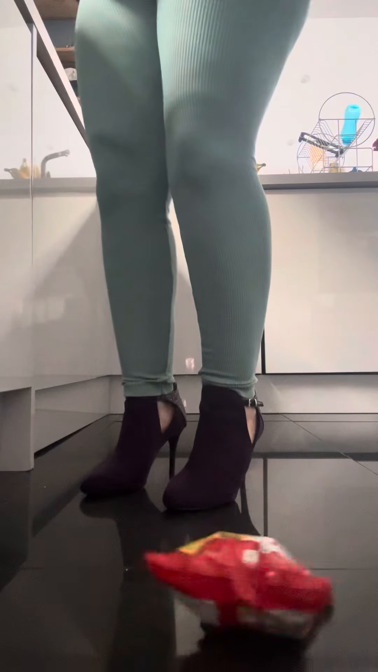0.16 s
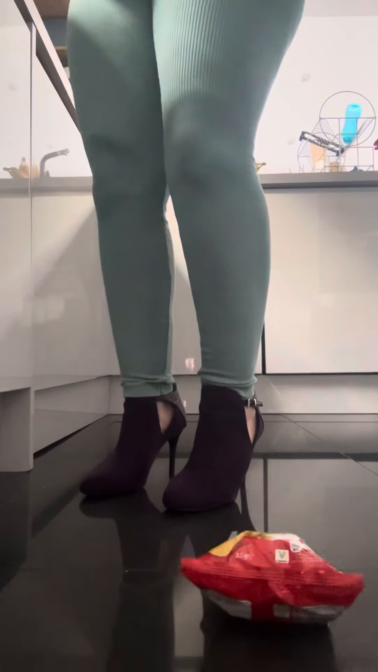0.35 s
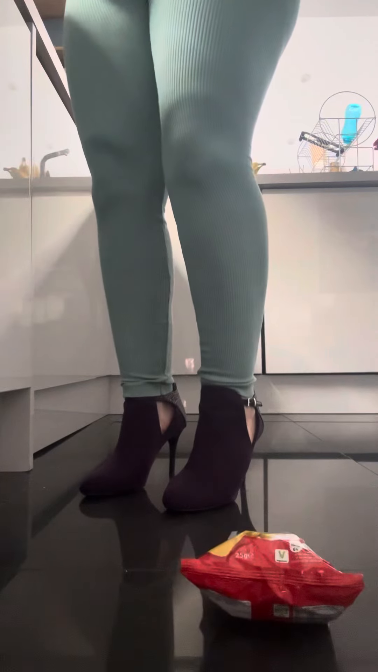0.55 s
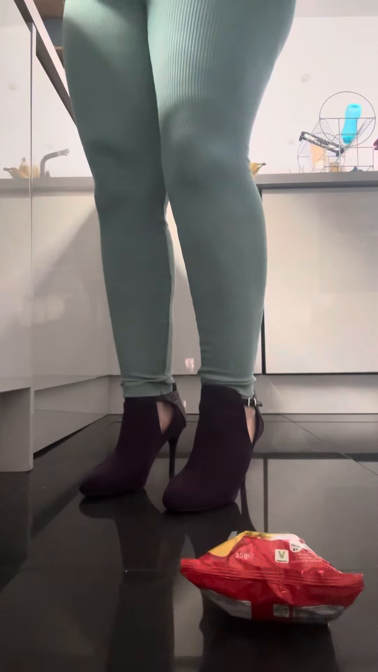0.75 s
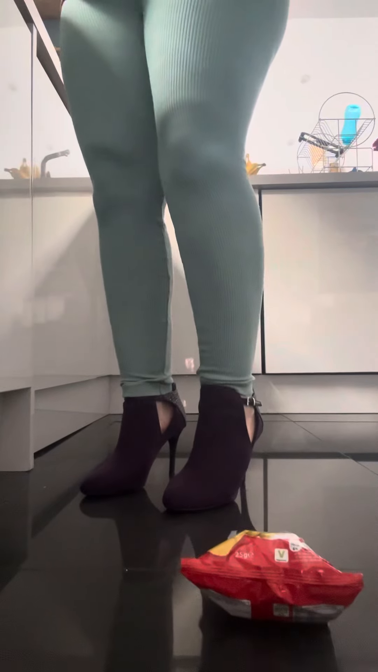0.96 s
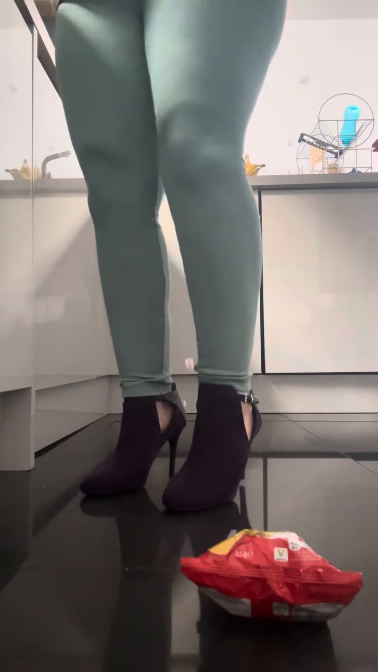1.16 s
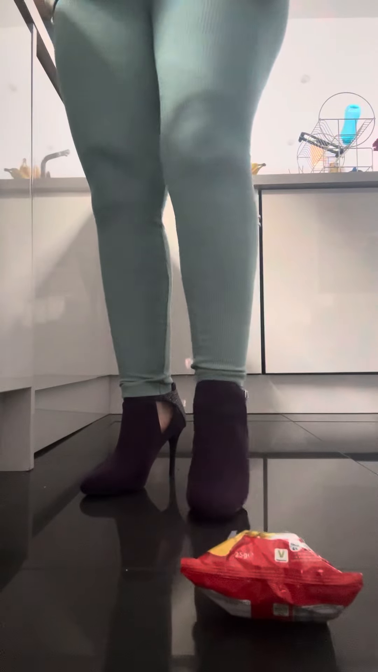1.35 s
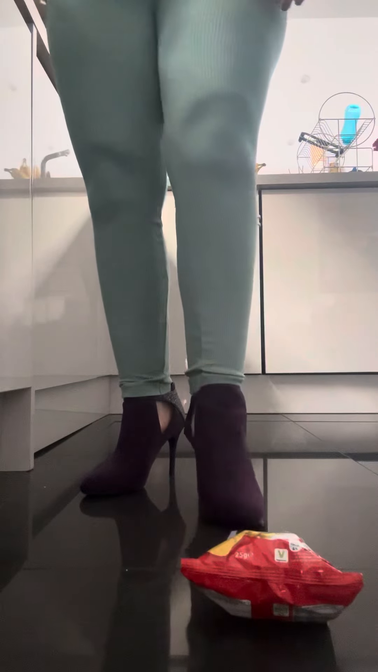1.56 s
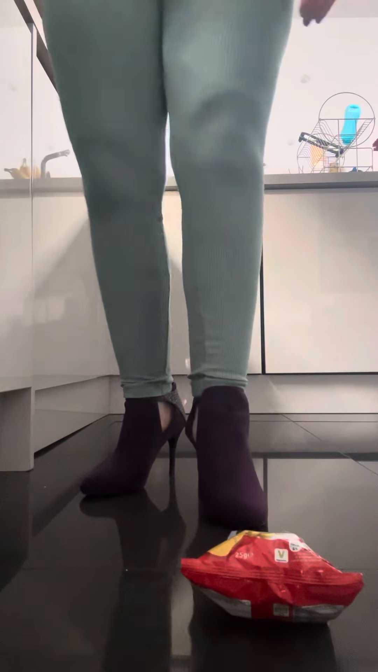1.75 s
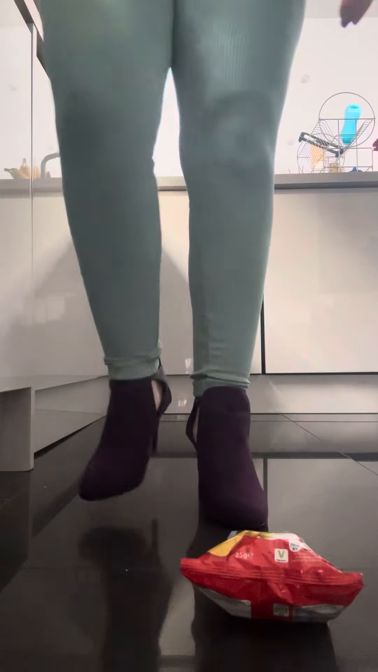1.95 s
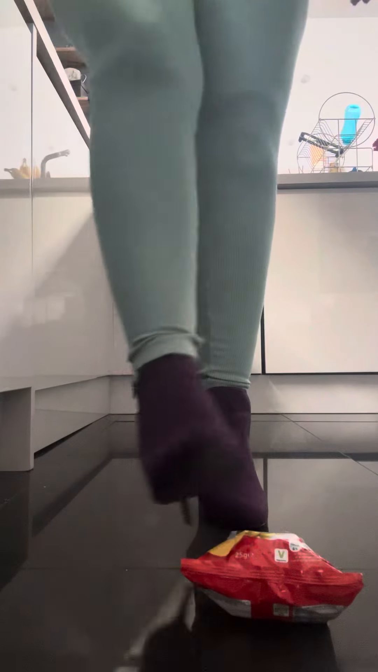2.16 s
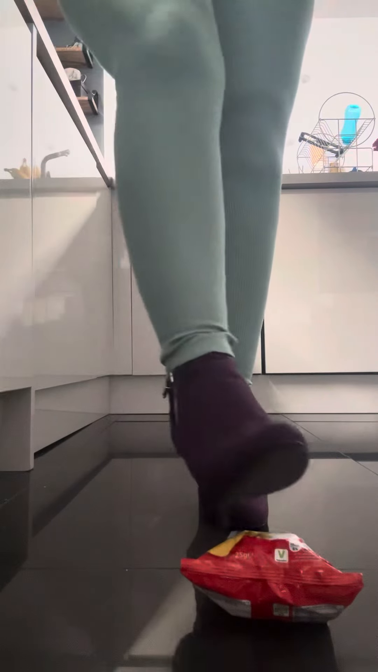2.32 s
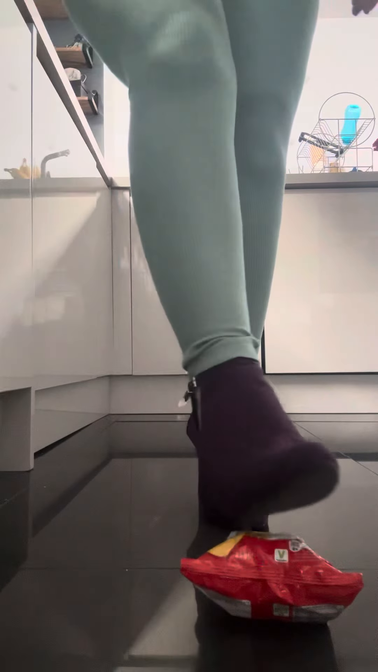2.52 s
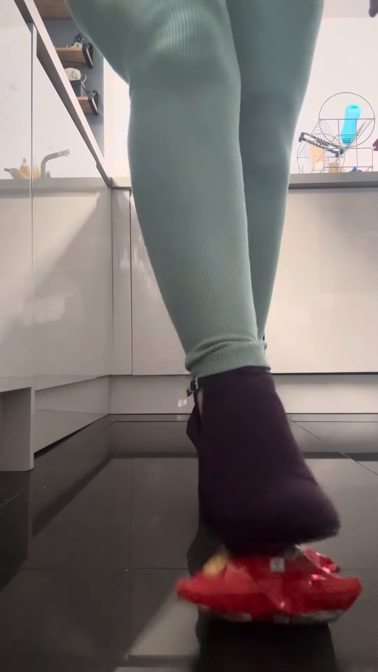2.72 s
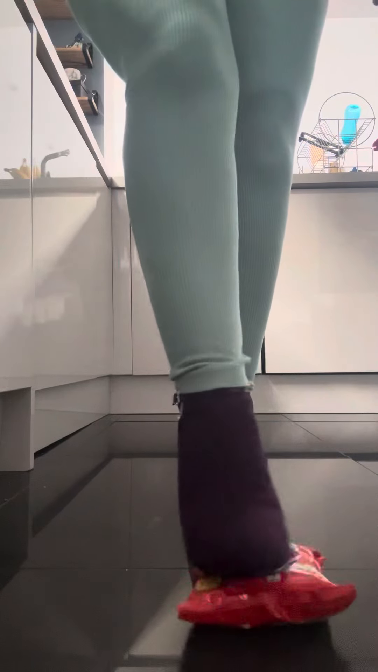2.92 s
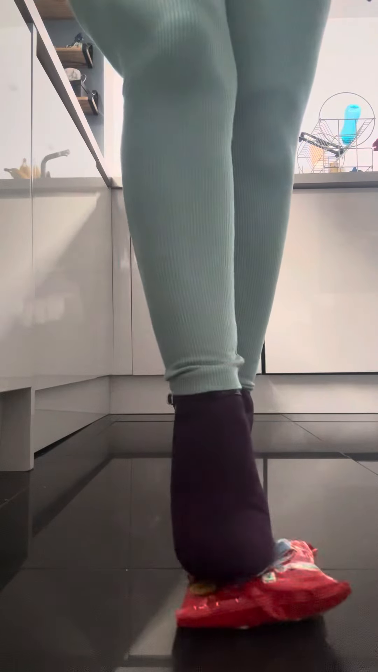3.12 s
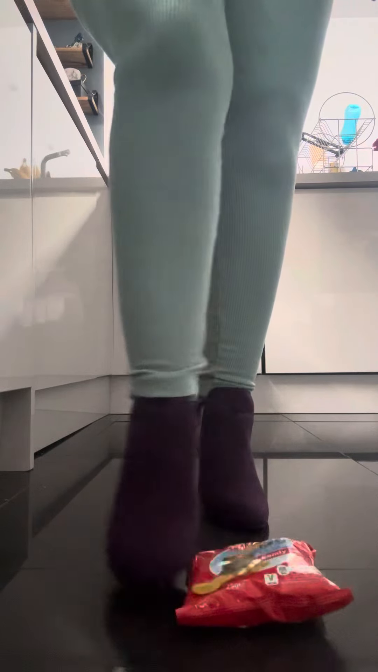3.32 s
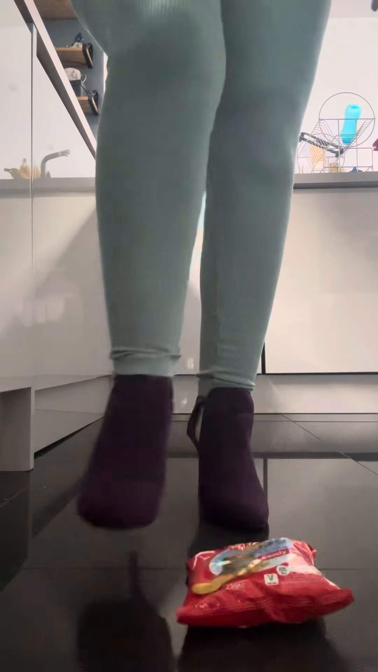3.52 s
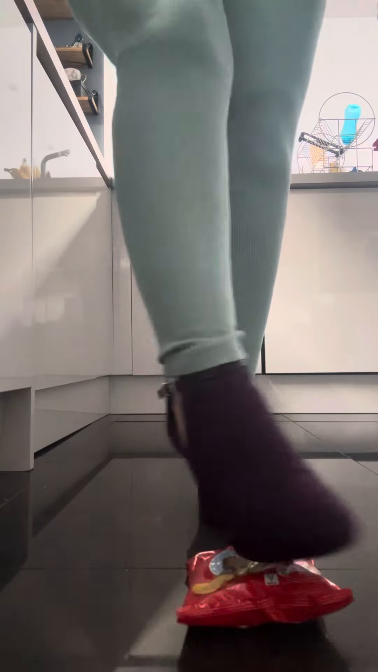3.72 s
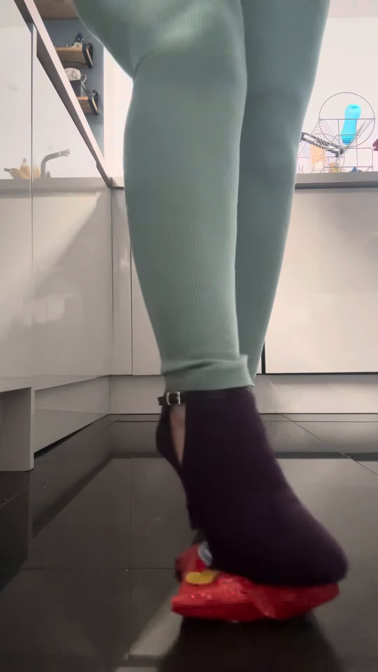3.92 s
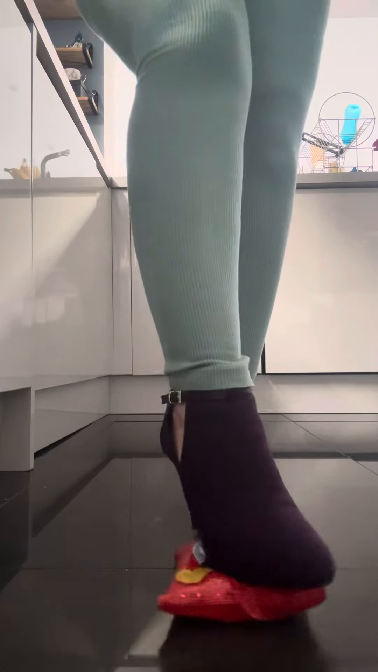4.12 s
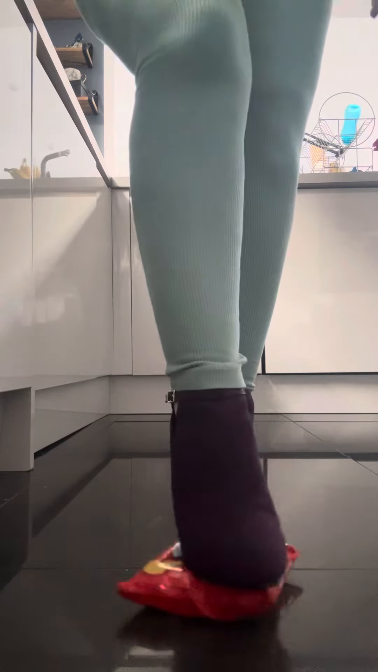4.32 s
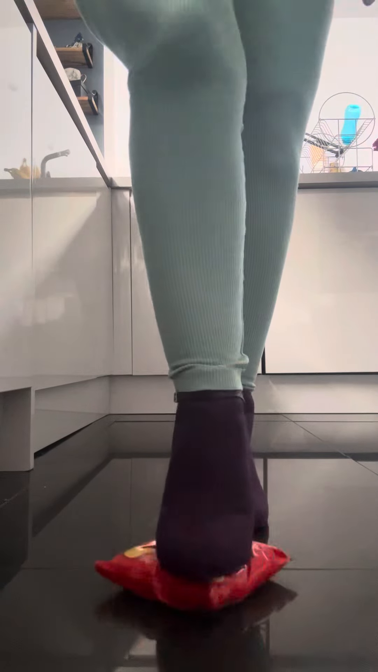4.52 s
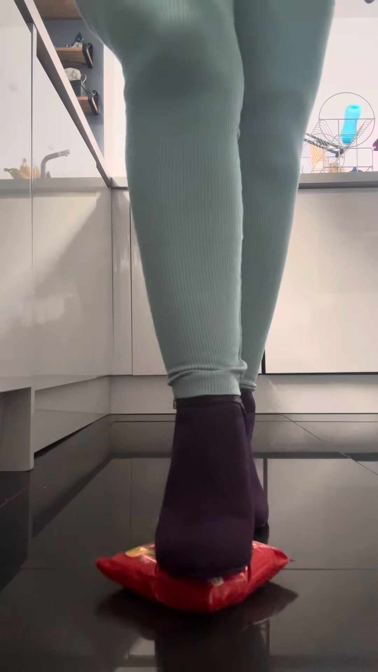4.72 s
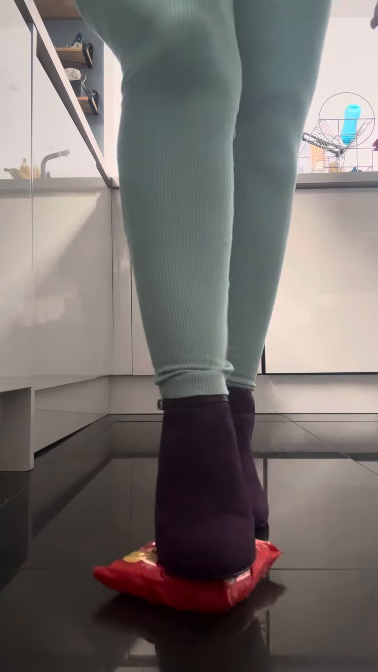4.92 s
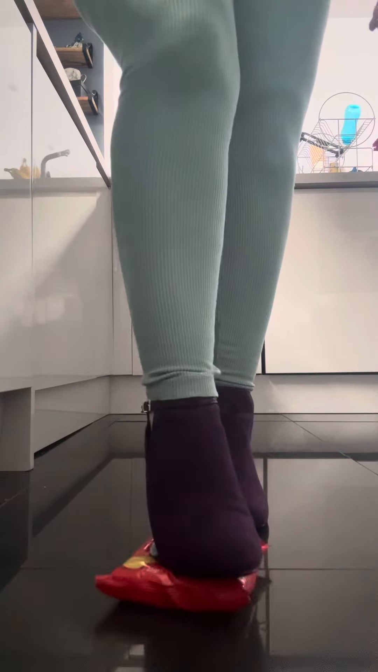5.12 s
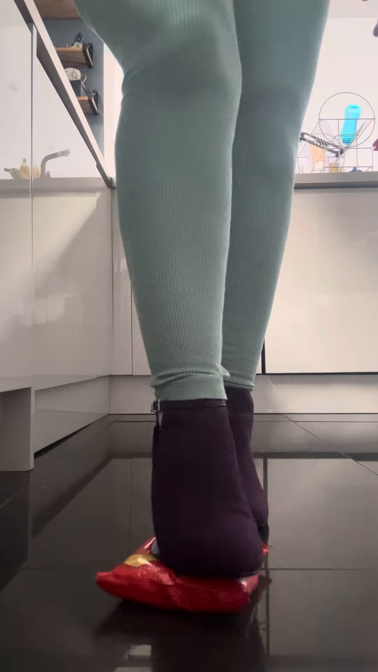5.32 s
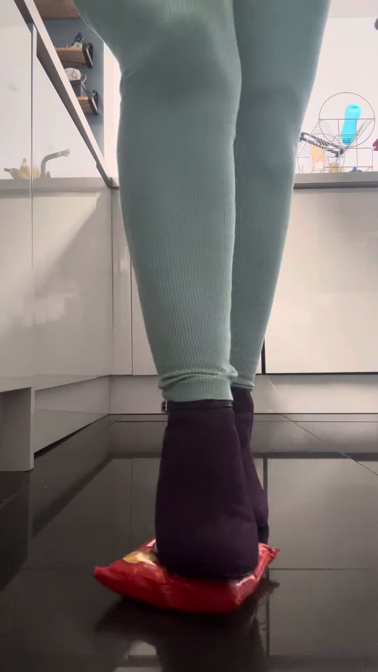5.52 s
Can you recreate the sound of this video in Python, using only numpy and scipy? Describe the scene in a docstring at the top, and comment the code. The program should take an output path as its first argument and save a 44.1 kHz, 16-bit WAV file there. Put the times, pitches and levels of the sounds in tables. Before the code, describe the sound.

A small hard kitchen, heard close in stereo, with a faint low fridge hum and soft hiss. At about 0.06 s a foil snack bag hits the tiles with a sharp crackling slap and a low puffy thump, its rustle fading quickly. Around 0.5 and 0.76 s, two dull booming slams come from the next room, shaking the floor and leaving a thin metallic ring. Heels knock lightly at 1.05 and 1.5 s, with a brief low rumble near 1.7 s and small ticks at 2.15 and 2.45 s. From 2.6 to 3.3 s a boot crushes the bag: snapping creases, dense foil crackle, crunching crisps and soft air thumps. A crisp heel tick lands at 3.53 s. A harder stamp hits at 3.9 s amid a raised steady hiss, then grinding crunches from 4.4 to 4.75 s, another sharp crunch at 5.0 s, and sparse, brittle crinkles until 5.65 s.

```python
"""A hard, ringing kitchen with a fridge hum, heard by two microphone ports a few centimetres apart.
A foil snack bag drops on the tiles; something heavy shuts twice in the next room; heels click, cloth rustles.
Then a heeled boot treads the bag flat: creases snap, crisps crunch, air is pushed.
Foil, tile and walls are struck resonances; hiss, contact and room tails are shaped noise."""
import sys
import numpy as np
from scipy import signal
from scipy.fft import rfft, irfft, next_fast_len
from scipy.io import wavfile

SR = 44100
rng = np.random.default_rng(int(sys.argv[2]) if len(sys.argv) > 2 else 0)


def inscribe(sig):
    """Save sig as 16-bit PCM at rate SR to the path in sys.argv[1].

    A 1-D sig is mono; a 2-D sig holds one channel per row.
    Samples are clipped to [-1, 1] before scaling.
    """
    pcm = np.round(np.clip(np.atleast_2d(sig).T, -1, 1) * 32767)
    wavfile.write(sys.argv[1], SR, pcm.astype(np.int16))


N = 250047

# Quiet background, hiss and rustle: (time [s], level [dB])
AIR_LEVEL = [(0, -51.5), (1.25, -67), (1.5, -60), (1.7, -62), (1.92, -54.5), (1.98, -65.5), (2.1, -83),
             (2.16, -68), (2.46, -62.5), (2.6, -74.5), (3.6, -62.5), (3.8, -72), (3.9, -47.5),
             (5.67, -47.5)]
# Colour of the hiss: (frequency [Hz], level [dB])
HISS_SPECTRUM = [(300, -21), (2000, -9), (3300, -3.5), (6000, -16.5), (10000, -27.5), (14000, -24),
                 (16000, -28)]
# Colour of the room tone: (frequency [Hz], level [dB])
ROOM_TONE_SPECTRUM = [(30, -15.5), (100, -2.5), (300, -9), (600, -16), (1500, -39.5)]
ROOM_TONE_DB = -60.5
HUM_HZ, HUM_DB = 187, -58
WHIRR_HZ, WHIRR_WIDTH_HZ, WHIRR_DB = 2550, 260, -6  # level against the hiss
# Weight shifting on the floor: (start [s], rumble level [dB], hold [s])
WEIGHT_SHIFTS = [(1.69, -42.5, 0.096)]
SHIFT_RISE_DB_PER_S, SHIFT_SAG_DB_PER_S, SHIFT_FALL_DB_PER_S = 388, 41.5, 163.5

# Slams in the next room: (time [s], boom drive [dB], floor shake drive [dB], rattle drive [dB])
DISTANT_SLAMS = [(0.512, -24, -28.5, -29.5), (0.558, -36, -32, -34), (0.757, -35, -61.5, -30),
                 (.767, -23.5, -40, -61)]
# Resonances of the walls: (frequency [Hz], level [dB], t60 [s])
WALL_MODES = [(111.4, -9.5, 0.33), (141, 1.5, 0.24), (174, 2, 0.17), (223.4, -6, 0.29), (293, -2, 0.099),
              (414.5, -2, 0.096)]
# The loose metal fitting is jolted: (time [s], drive [dB])
FITTING_JOLTS = [(.512, 0), (.558, -7), (.758, -9)]
# Resonances of the fitting: (frequency [Hz], level [dB], t60 [s])
FITTING_MODES = [(1065, -54, 0.8), (1976, -45, 0.9), (2159, -48, 0.6), (2540, -53, 0.5), (3036, -40, 0.5),
                 (4247, -48, 0.5), (4430, -47, 0.55), (4940, -49, 0.12)]

# Heels on tile: (time [s], knock drive [dB], knock pitch [Hz], tick drive [dB])
HEEL_STEPS = [(1.045, -45, 530, -34.5), (1.511, -31.5, 520, -62.5), (2.147, -68.5, 400, -30.5),
              (2.405, -47, 1000, -62.5), (2.457, -62.5, 2400, -32), (3.531, -56, 870, -22.5)]
# Resonances of the tile: (frequency [Hz], level [dB], t60 [s])
TILE_MODES = [(190, -1, 0.037), (286, -2.5, 0.064), (418, -2, 0.07), (609, 6.5, 0.029), (760, -7, 0.0092)]

# The cushion of air in the bag is pushed: (time [s], drive [dB], pitch [Hz])
AIR_PUSHES = [(0.071, -22.5, 84.7), (2.714, -30, 210), (2.856, -15, 367), (3.892, -7.5, 400),
              (3.906, -22, 190), (4.716, -6, 410), (4.722, -24.5, 160), (5.01, -13, 375),
              (5.142, -22.5, 122)]
# The bag lands, then the sole presses in separate crunches: (start [s], crackle drive [dB], hold [s])
BAG_CRUNCHES = [(.053, -32, .008), (.062, -20, 0.0011), (.085, -40, 0.26), (2.588, -38.5, 0.022),
                (2.708, -31, 0.084), (2.84, -23, 0.15), (3.158, -35, 0.061), (3.22, -29.5, 0.0087),
                (3.29, -41.5, 0.0052), (3.857, -37, .012), (3.874, -27.5, .012), (3.888, -18.5, 0.0092),
                (3.93, -23.5, 0.021), (4.218, -35, 0.027), (4.44, -36.5, 0.035), (4.48, -41, .07),
                (4.56, -27.5, 0.19), (5.012, -21.5, 0.011), (5.07, -33, 0.067), (5.135, -35.5, 0.12),
                (5.55, -43, 0.012), (5.63, -43.5, .04)]
CRUNCH_RISE_DB_PER_S, CRUNCH_SAG_DB_PER_S, CRUNCH_FALL_DB_PER_S = 2002, 40.5, 304.5
# Single creases snapping: (time [s], drive [dB], patch pitch [Hz], treble [dB])
CREASE_SNAPS = [(0.01, -31.5, 1970, -47), (0.062, -21.5, 1600, 14), (0.066, -4.5, 923, -20),
                (2.583, -40, 880, -23), (2.609, -38, 910, 2), (2.711, -16.5, 935, -8),
                (2.737, -15, 2110, -5), (2.757, -24.5, 1900, -1), (2.78, -17.5, 2120, -14),
                (2.841, -14.5, 2810, -18), (2.853, -16, 900, -17), (2.872, -9, 2055, -27.5),
                (2.9, -18.5, 1700, -26), (2.931, -8, 820, -12), (2.951, -13.5, 810, -10),
                (2.997, -14.5, 2060, 0), (3.011, -23, 950, -15), (3.164, -24, 800, -17),
                (3.176, -24, 1860, -13), (3.211, -19, 2140, -28), (3.232, -38, 1670, -5),
                (3.294, -25, 686, -6.5), (3.338, -26.5, 2670, -27), (3.871, -22.5, 847, -42),
                (3.892, -11.5, 1530, -11), (3.911, -6.5, 867, -12), (3.922, -8.5, 930, -6),
                (3.936, -16.5, 880, -4), (3.978, -13.5, 816, -15), (4.161, -30, 760, -1.5),
                (4.221, -18, 900, -32), (4.238, -20, 834, -4), (4.396, -29, 1020, -8.5),
                (4.471, -20.5, 900, -5), (4.505, -11.5, 1810, -8.5), (4.519, -19.5, 1900, -7),
                (4.558, -13.5, 3150, -0.5), (4.571, -15, 920, 3.5), (4.578, -14, 1660, -7),
                (4.601, -17.5, 2950, -1), (4.617, -25.5, 860, 10), (4.636, -18.5, 3080, 1),
                (4.653, -20, 1050, 10), (4.686, -19.5, 3000, 4.5), (4.712, -13, 1810, -2.5),
                (4.72, -13.5, 3080, -2.5), (4.909, -21.5, 3470, 1), (4.938, -20, 1830, 2),
                (5.009, -6, 1120, -6), (5.135, -29, 1720, 9), (5.144, -24, 1650, 7), (5.186, -28, 4430, 13),
                (5.227, -26.5, 1190, 6.5), (5.236, -22.5, 3070, 3.5), (5.302, -27, 2000, 6),
                (5.356, -31, 3160, 1.5), (5.395, -26, 2040, 1), (5.429, -40.5, 1130, 11.5),
                (5.514, -35, 1710, 8), (5.564, -30, 3100, 9), (5.634, -41, 1960, 14), (5.655, -27, 1080, 1)]
# Colour of the foil: (frequency [Hz], level [dB])
FOIL_SPECTRUM = [(100, -30), (330, -9.5), (600, -2), (1000, 1.5), (2000, -2), (3200, 2.5), (5000, -6.5),
                 (7000, -7), (10000, -12.5), (16000, -17)]

# Decay of the kitchen: (frequency [Hz], t60 [s])
KITCHEN_DECAY = [(100, 0.53), (2000, 0.45), (5000, 0.48), (13000, 0.35)]
# Phase by which the left port leads: (frequency [Hz], lead [rad])
LEFT_LEAD = [(150, 0), (700, .5), (1700, .1), (2400, -2.6), (3000, -3.4), (4100, -3.3), (6100, -5),
             (7200, -4.4), (8200, -3.2), (10300, -3.1), (12400, -.9), (13500, -.1)]
# Level of the left port over the right: (frequency [Hz], difference [dB])
LEFT_LOUDER = [(400, 0), (1000, 4), (1900, 8), (2700, 5), (3300, 5), (4200, 0)]
# The part the ports do not share: (frequency [Hz], level [dB])
UNSHARED_SPECTRUM = [(60, -33.5), (500, -7), (1500, -6.5), (4500, -5.5), (7200, -21.5), (10300, -22.5),
                     (13500, -21.5)]
CUTOFF_HZ = 16900


def amp(db):
    """Gain of a level in dB."""
    return 10 ** (np.asarray(db) / 20)


def rms_one(x):
    """Scale to unit rms."""
    return x / np.sqrt(np.mean(x ** 2) + 1e-20)


def in_time(rows):
    """A curve, sample by sample."""
    return np.interp(np.arange(N) / SR, *np.transpose(rows))


def at_hz(points, hz):
    """Read a spectrum on a log-frequency axis."""
    f, v = np.transpose(points)
    return np.interp(np.log(hz + 1), np.log(f + 1), v)


def coloured(x, spectrum):
    """Give x the spectrum; white noise of rms 1 keeps rms 1."""
    size = next_fast_len(x.shape[-1] + SR // 10)
    hz = np.arange(size // 2 + 1) * SR / size
    gain = rms_one(amp(at_hz(spectrum, hz)))
    return irfft(rfft(x, size) * gain, size)[..., :x.shape[-1]]


def band(x, low_hz, high_hz):
    """Butterworth band-pass."""
    edges = np.clip([low_hz, high_hz], 10, .45 * SR)
    return signal.sosfilt(signal.butter(2, edges, "band", fs=SR, output="sos"), x + 1e-18)


def drift(rate_hz):
    """Slow random wander of rms 1: noise through a two-pole low-pass."""
    r = np.exp(-2 * np.pi * rate_hz / SR)
    wander = signal.lfilter([1], [1, -2 * r, r * r], rng.standard_normal(N + SR))
    return rms_one(wander[SR:])


def train(times, db):
    """One click per event."""
    out = np.zeros(N)
    np.add.at(out, np.minimum((np.asarray(times) * SR).astype(int), N - 1), amp(db))
    return out


def fading(clicks, seconds):
    """Each click becomes an envelope that dies with this time constant."""
    return signal.lfilter([1], [1, -np.exp(-1 / (seconds * SR))], clicks + 1e-18)


def burst(clicks, rise_s, fall_s):
    """Noise under an envelope that swells fast and dies slower."""
    envelope = fading(fading(clicks, fall_s), rise_s) / (rise_s * SR)
    return envelope * rng.standard_normal(N)


def crack(times, db, rise_s, fall_s):
    """Short bursts of even spectrum and random phase, a new one for every event; peak near the given level."""
    t = np.arange(1024) / SR
    shape = np.exp(-t / fall_s) * (1 - np.exp(-t / rise_s))
    spectra = rfft(rng.standard_normal((len(times), len(t))) * shape)
    bursts = irfft(spectra / np.abs(spectra)) * np.sqrt(shape)
    out = np.zeros(N + len(t))
    for s, gain, b in zip(times, amp(db), bursts):
        start = int(s * SR)
        out[start:start + len(t)] += gain * b / np.sqrt(np.sum(b ** 2) / np.sum(shape ** 2))
    return out[:N]


def ring(clicks, hz, t60):
    """A unit click sets a decaying sine of starting height 1 ringing."""
    r, w = amp(-60 / (t60 * SR)), 2 * np.pi * hz / SR
    return signal.lfilter([0, np.sin(w)], [1, -2 * r * np.cos(w), r * r], clicks + 1e-18)


def struck(force, modes):
    """All modes of a body, signs alternating."""
    return sum((-1) ** k * amp(db) * ring(force, hz, t60) for k, (hz, db, t60) in enumerate(modes))


def presses(rows, rise, sag, fall):
    """Level in dB of presses that swell up to their start, sag while held and then die; slopes in dB per second."""
    t = np.arange(N) / SR
    levels = []
    for s, db, hold in rows:
        before, held, after = np.maximum(s - t, 0), np.clip(t - s, 0, hold), np.maximum(t - s - hold, 0)
        levels.append(db - rise * before - sag * held - fall * after)
    return np.max(levels, axis=0)


def background():
    """Shared and unshared parts of hiss, a narrow whirr within it and room tone; rumble and fridge hum are shared."""
    air_db = in_time(AIR_LEVEL)
    hiss = amp(air_db + 1.8 * drift(39)) * coloured(rng.standard_normal((2, N)), HISS_SPECTRUM)
    half_width = WHIRR_WIDTH_HZ / 2
    whirr = rms_one(band(rng.standard_normal((2, N)), WHIRR_HZ - half_width, WHIRR_HZ + half_width))
    tone = amp(ROOM_TONE_DB) * coloured(rng.standard_normal((2, N)), ROOM_TONE_SPECTRUM)
    rumble_db = presses(WEIGHT_SHIFTS, SHIFT_RISE_DB_PER_S, SHIFT_SAG_DB_PER_S, SHIFT_FALL_DB_PER_S)
    rumble = amp(rumble_db) * rms_one(band(rng.standard_normal(N), 28.2, 84))
    hum_gain = amp(HUM_DB + 0.84 * drift(3)) * np.sqrt(2)  # sine peak over rms
    hum = hum_gain * np.sin(2 * np.pi * HUM_HZ * np.arange(N) / SR)
    return hiss + amp(air_db + WHIRR_DB) * whirr + tone + (rumble + hum) * [[1], [0]]


def slams():
    """Each slam booms through the walls, shakes the floor, sets a loose metal fitting ringing and rattles loose things."""
    s, boom_db, floor_db, rattle_db = np.transpose(DISTANT_SLAMS)
    boom = struck(band(train(s, boom_db), 52, 720), WALL_MODES)
    floor = ring(train(s + 0.018, floor_db), 49.4, 0.47)
    jolts = train(*np.transpose(FITTING_JOLTS))
    # every mode of the fitting flutters in level on its own
    metal = sum(struck(jolts, [mode]) * (1 + .4 * drift(35)) for mode in FITTING_MODES)
    rattle = burst(train(s, rattle_db), 0.00043, 0.039)
    rattle = band(band(rattle, 360, 4200), 350, 4200)
    return boom + floor + rattle, metal


def heels():
    """A short scuff of contact: the heel knocks and ticks, the tile rings low; a bright knock moves the tile less."""
    knocks = np.zeros(N)
    for s, knock_db, hz, _ in HEEL_STEPS:
        contact = crack([s], [knock_db], 0.0018, 0.019)
        knocks += amp(6) * band(contact, hz / 1.5, hz * 2.2)
        knocks += amp(-16.5 - 17.0 * np.log2(hz / 500)) * struck(contact, TILE_MODES)
    s, _, _, tick_db = np.transpose(HEEL_STEPS)
    ticks = band(crack(s, tick_db, 0.00054, 0.0014), 510, 2900)
    return knocks + ticks


def thumps(cycles, lag_s, deep_db):
    """Each push is one soft blow on the air cushion, gone after a few cycles; a weaker 90 Hz thud sounds just after."""
    blows = sum(ring(train([s], db), hz, cycles / hz) for s, db, hz in AIR_PUSHES)
    s, db, _ = np.transpose(AIR_PUSHES)
    late_thuds = ring(train(s + lag_s, db + deep_db), 90, .035)
    return band(blows + late_thuds, 60, 700)


def crackle(per_s, spread_db, clump_db, cycles, treble_db, crumbs_db):
    """Tiny buckles of the foil come in clumps, each ringing a few cycles on a patch of its own size; crisps crumble below."""
    crackle_db = presses(BAG_CRUNCHES, CRUNCH_RISE_DB_PER_S, CRUNCH_SAG_DB_PER_S, CRUNCH_FALL_DB_PER_S)
    sizes = amp(spread_db * np.minimum(rng.exponential(1, N), 4)) * rng.choice([-1, 1], N)
    together, chance = drift(70), rng.random(N)
    # patches of like size (five groups) clump partly on their own
    busy = [per_s * amp(clump_db * (.6 * together + .8 * drift(50))) / SR for group in range(5)]
    pitches = np.geomspace(200, 15500, 30)
    dealt = rng.integers(0, 30, N)  # which patch may buckle at each sample
    rings = []
    for k, hz in enumerate(pitches):
        buckles = sizes * (chance < busy[k // 6] * np.sqrt(hz / 1500)) * (dealt == k)
        rings.append(rms_one(ring(buckles, hz, cycles / hz)) * np.sqrt(hz))
    rings = np.array(rings)
    low, middle, treble = rings[:8].sum(axis=0), rings[8:22].sum(axis=0), rings[22:].sum(axis=0)
    foil = amp(crackle_db) * rms_one(middle + amp(treble_db) * treble)
    crumbs = amp(crackle_db + crumbs_db) * rms_one(band(low, 80, 800))
    return foil, crumbs


def snaps(cycles, rise_s, fall_s):
    """A crease gives way in a burst of a few milliseconds, no two equally long, and rings its patch of foil at two pitches."""
    out = np.zeros(N + 2048)
    for s, db, hz, treble_db in CREASE_SNAPS:
        length, overtone = np.exp(rng.normal(0, .3)), rng.uniform(1.6, 2.4)
        push = crack([0], [db], rise_s * length, fall_s * length)[:2048]
        rung = sum(amp(level_db) * ring(push, f, cycles / f) * np.sqrt(f / cycles / SR)
                   for f, level_db in [(hz, 9.0), (hz * overtone, 3.0)])
        broad = amp(-10.5) * band(push, hz / 2, hz * 2.9)
        treble = amp(10.5 + treble_db) * band(band(push, 4300, 16500), 4300, 16500)
        start = int(s * SR)
        out[start:start + 2048] += rung + broad + treble
    return out[:N]


def kitchen(x, gap_s):
    """Two unrelated tails of noise that die band by band, fading in around the delay of the first wall."""
    t, tails = np.arange(SR) / SR, 0
    white = rng.standard_normal((2, SR))
    for hz in 60 * 2 ** np.arange(0, 8.1, .5):  # half-octave bands
        decay = amp(-60 * t / at_hz(KITCHEN_DECAY, hz))
        tails = tails + band(white, hz / 2 ** .25, hz * 2 ** .25) * decay
    tails = tails * np.clip(t / gap_s - .5, 0, 1)
    return signal.fftconvolve(x[None], rms_one(tails) / np.sqrt(SR), axes=1)[:, :N]


def scatter(near):
    """Near sounds scatter off the close floor within milliseconds; the colour wanders slowly between two short paths."""
    glances = [crack([0], [0], .0003, .005)[:1024] for path in range(2)]
    turn = 2 * drift(3)
    scattered = 0
    for glance, share in zip(glances, [np.sin(turn), np.cos(turn)]):
        unit_glance = glance / np.sqrt(np.sum(glance ** 2))
        scattered = scattered + signal.fftconvolve(near * share, unit_glance)[:N]
    return amp(2.5) * scattered


def ports(shared, unshared):
    """The two ports hear the shared sound with a phase and level step that depends on pitch."""
    size = next_fast_len(N + SR // 10)
    hz = np.arange(size // 2 + 1) * SR / size
    # half of each step goes to either port; the unshared part has opposite signs
    step = amp(at_hz(LEFT_LOUDER, hz) / 2) * np.exp(.5j * at_hz(LEFT_LEAD, hz))
    a, b = rfft(shared, size), rfft(unshared, size) * amp(at_hz(UNSHARED_SPECTRUM, hz))
    return irfft(np.array([(a + b) * step, (a - b) / step]), size)[:, :N]


def scene():
    """Bag and heels are near and partly direct; the next room's slams reach the ports direct and through the kitchen."""
    far, ringing = slams()
    foil, crumbs = crackle(per_s=1400., spread_db=4.5, clump_db=5.0, cycles=6.3, treble_db=3.0, crumbs_db=-8.5)
    creases = snaps(cycles=11.0, rise_s=0.00062, fall_s=0.0021)
    near = coloured(foil + creases, FOIL_SPECTRUM) + crumbs + heels()
    near += thumps(cycles=3.4, lag_s=0.0032, deep_db=-18.5)
    to_room = amp(-6.0) * near + amp(-4) * far + amp(-7) * ringing
    # the unshared tail is 4 dB up before the ports colour it
    shared, unshared = kitchen(to_room, gap_s=0.0051) * amp([[0], [4]]) + background()
    return ports(near + far + ringing + shared, unshared + scatter(near))


def record(dry):
    """The microphones lose the deepest bass, the loudest peaks are rounded and the top is cut."""
    body = signal.sosfilt(signal.butter(4, 38, "high", fs=SR, output="sos"), dry)
    rounded = .8 * np.tanh(body / .8)
    return signal.sosfilt(signal.cheby2(16, 95, CUTOFF_HZ, fs=SR, output="sos"), rounded)


dry = scene()
out = record(dry)
inscribe(out)
```